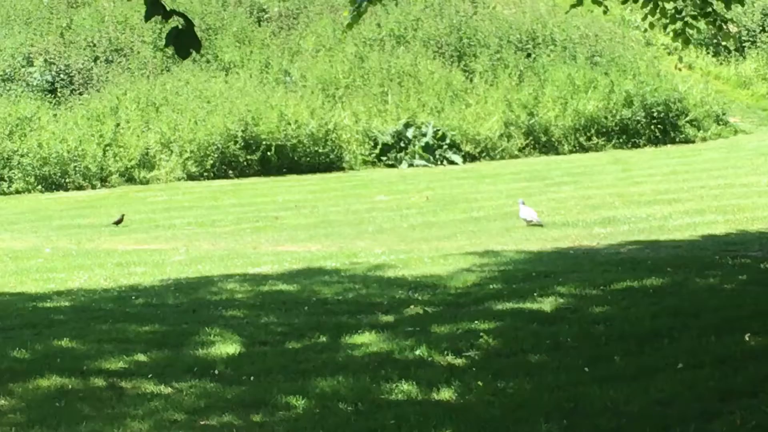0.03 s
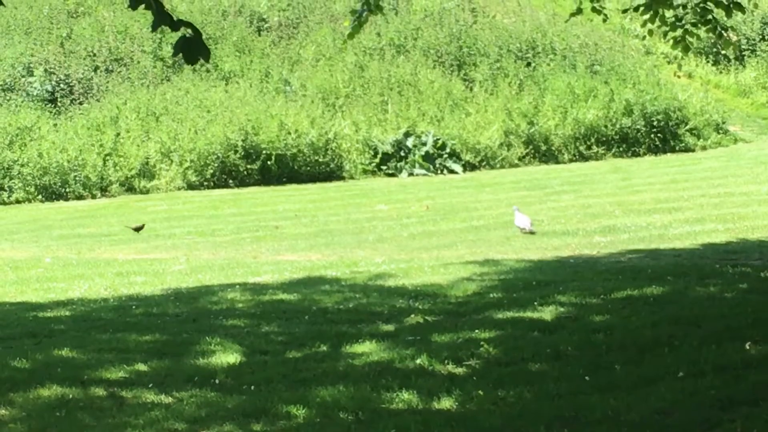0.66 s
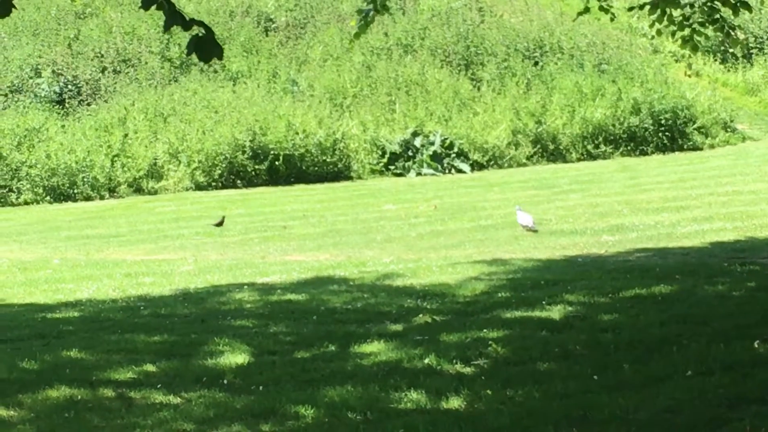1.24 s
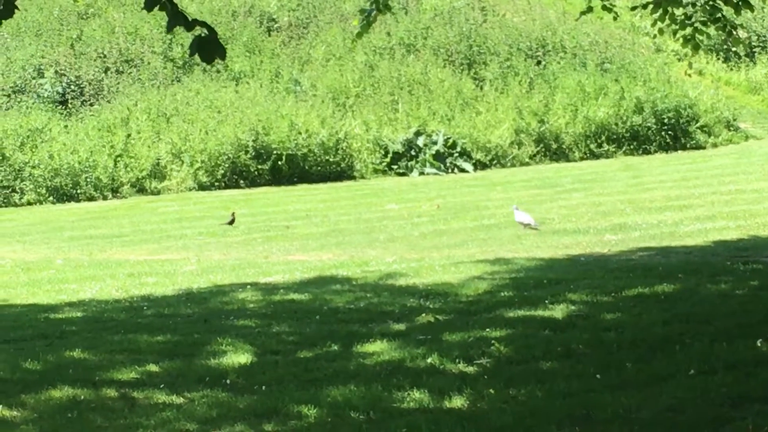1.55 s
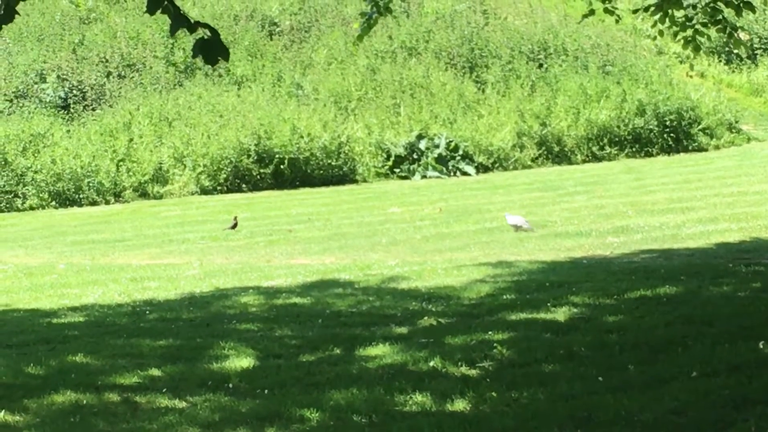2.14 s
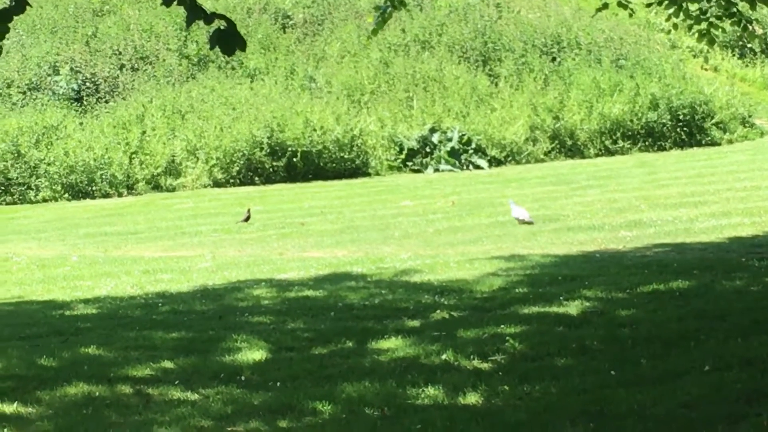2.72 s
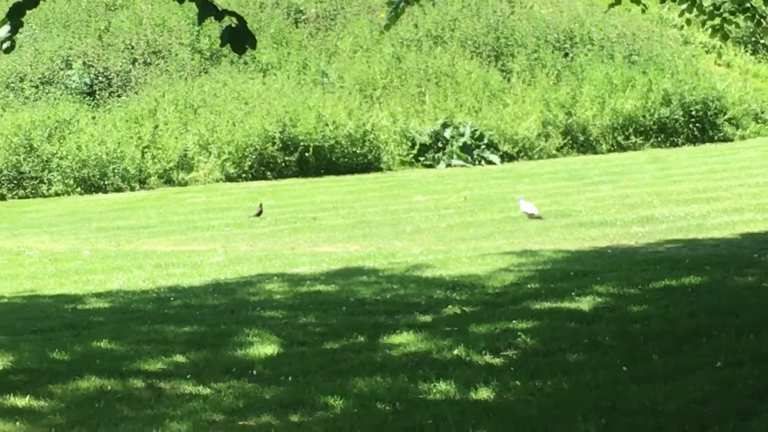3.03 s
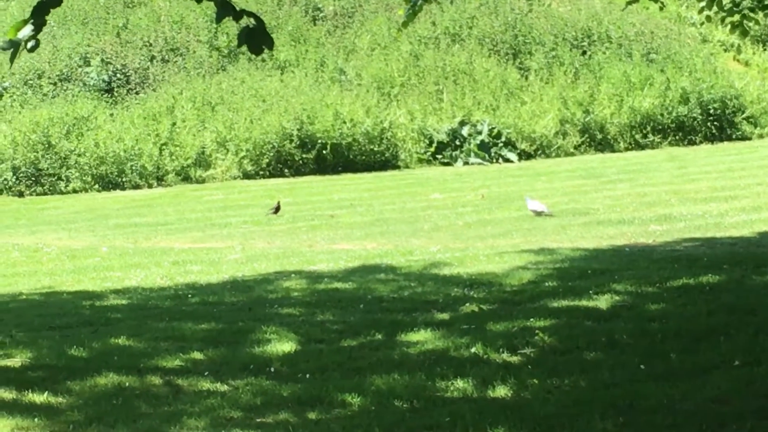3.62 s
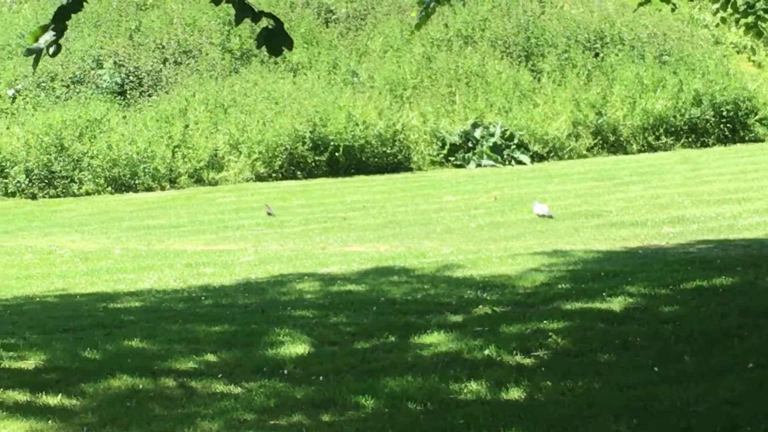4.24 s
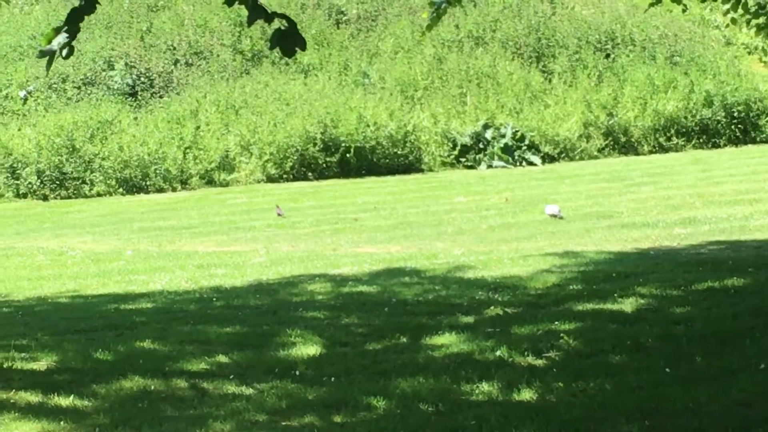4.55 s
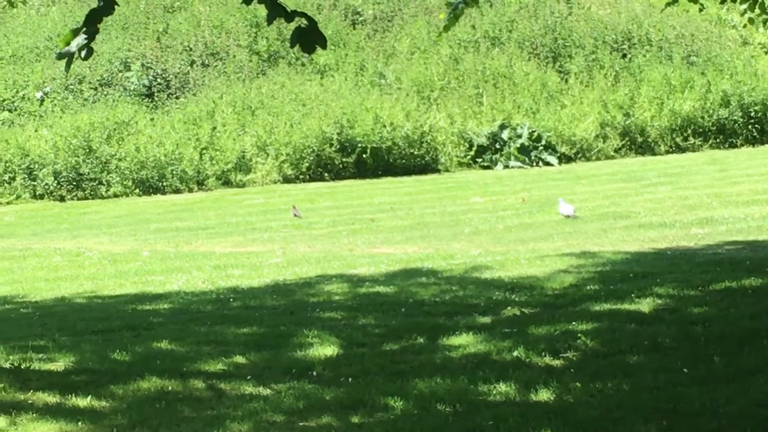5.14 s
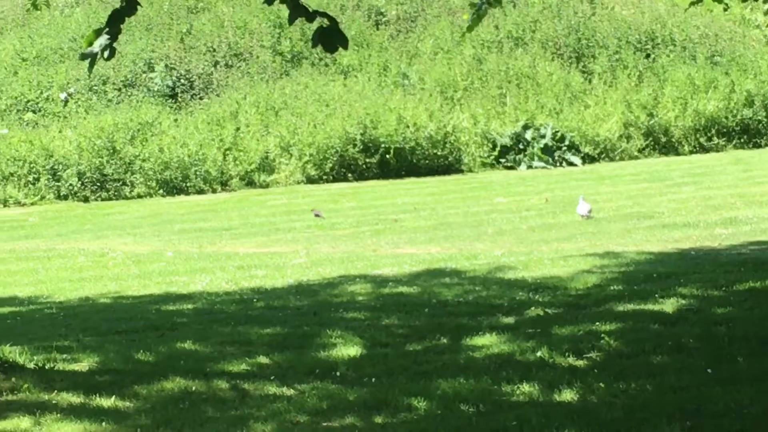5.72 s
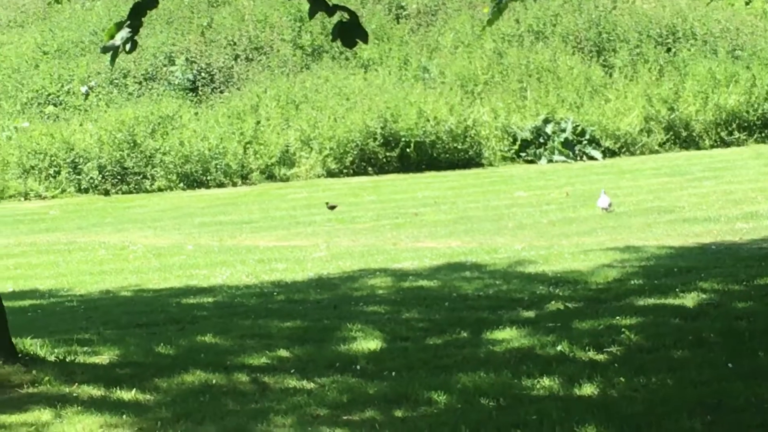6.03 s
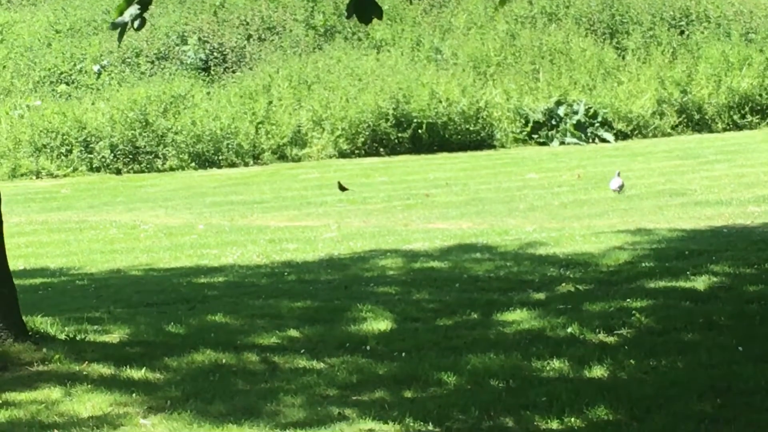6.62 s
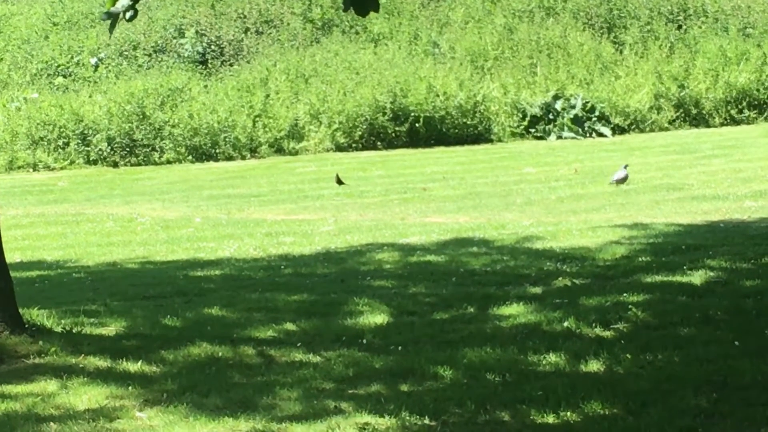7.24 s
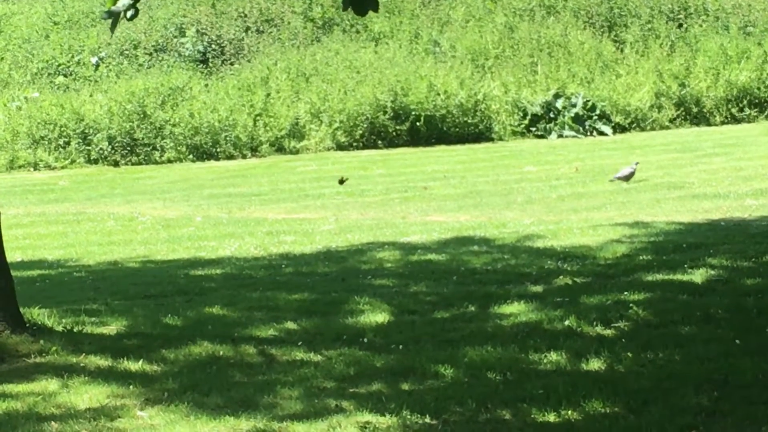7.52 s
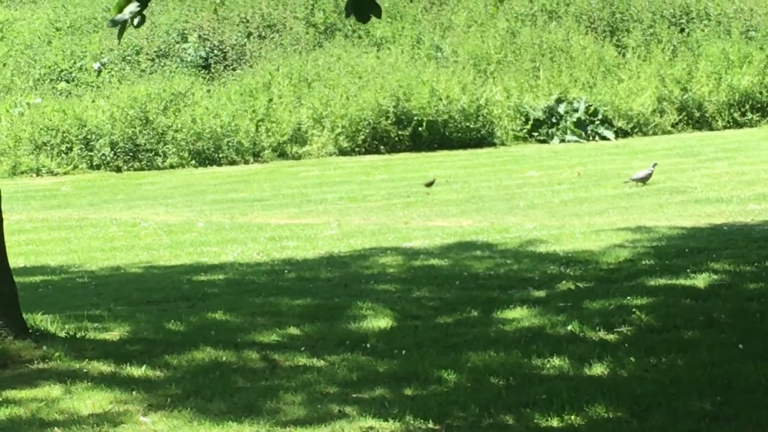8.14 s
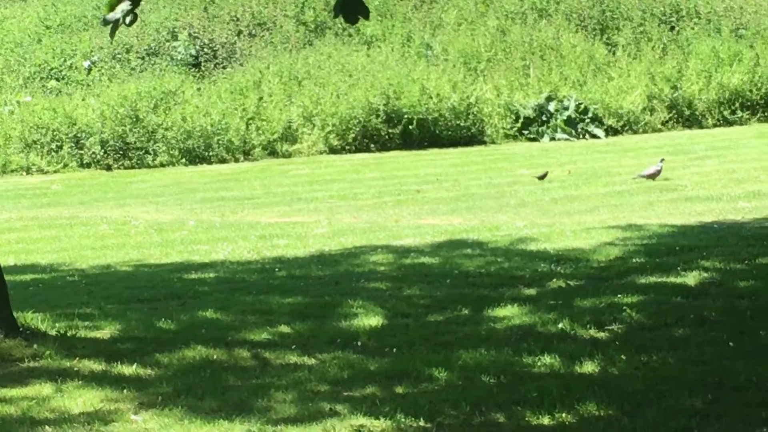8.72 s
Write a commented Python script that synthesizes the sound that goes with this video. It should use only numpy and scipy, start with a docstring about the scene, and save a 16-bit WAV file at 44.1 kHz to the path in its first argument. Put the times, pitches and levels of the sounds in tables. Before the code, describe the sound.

Distant traffic rumbles steadily outdoors while a tiny bird repeats high alternating notes and a lower bird whistles far off near the end.

```python
"""A lawn with trees, near a distant road: rumble, engine drone, tyre roar, a breeze in the leaves.
A tiny songbird sings one thin, very high phrase: soft slurs, then a repeated figure of long whistle,
low lift and arched note. A twig ticks and scrapes once. Far off, one bird pipes softly and a lower one
whistles near the end. Each note is a pure syrinx tone, smeared by echoes from the foliage."""
import sys
import numpy as np
from scipy import signal
from scipy.fft import rfft, irfft
from scipy.io import wavfile

SR = 44100
rng = np.random.default_rng(int(sys.argv[2]) if len(sys.argv) > 2 else 0)


def digitize_waveform(pressure):
    """Quantize a signal to 16-bit integers and store it at the path in sys.argv[1].

    Rows of a 2-D input are taken as channels; values are limited to [-1, 1].
    """
    field = np.atleast_2d(pressure).T
    bounded = np.clip(field, -1, 1)
    quanta = np.round(bounded * 32767).astype(np.int16)
    wavfile.write(sys.argv[1], SR, quanta)


N = 391166
TIME_S = np.arange(N) / SR
FREQS_HZ = np.maximum(np.fft.rfftfreq(N, 1 / SR), 1)

# Noise colours. Each row: frequency in Hz, relative density in dB.
RUMBLE_SPECTRUM = [(15, -34), (23, -32.5), (32, -13), (41, -5.5), (56, 0.5), (72, -1.5), (100, -8),
                   (140, -11), (230, -15.5), (290, -22), (360, -25.5), (450, -32)]
TYRE_SPECTRUM = [(450, -10.5), (560, -8), (800, -3.5), (1000, 0.0), (1300, -4), (1700, -8), (2200, -12.5),
                 (2850, -20), (3300, -21), (4200, -26.5), (5000, -32)]
HISS_SPECTRUM = [(5000, -1), (5500, 0.5), (6500, -2), (7500, -6), (8500, -4.5), (9800, -5.5), (10400, -10),
                 (11200, -6.5), (13500, -8.5), (15500, -9)]
TWIG_SPECTRUM = [(900, -8), (1800, 6), (2800, 4), (4000, -3), (5000, -13), (8000, -27)]
# Slow swells. Each row: time in seconds, relative level in dB.
RUMBLE_SWELL = [(0.3, -44.5), (1.0, -47), (1.7, -44.5), (3.0, -46.5), (3.55, -43), (4.1, -50.5),
                (4.65, -44), (5.25, -51.5), (5.8, -45.5), (6.2, -48), (7.2, -45.5), (7.6, -47.5),
                (8.7, -46)]
DRONE_SWELL = [(0.4, -54.5), (0.9, -52.5), (2.2, -53), (4.2, -53), (6.1, -53), (6.6, -54.5), (7.8, -54.5),
               (8.8, -49.5)]  # grows at the end
TYRE_SWELL = [(0.1, -55.5), (2.4, -54.5), (3.2, -55.5), (5.1, -55.5), (8.3, -55)]  # one vehicle passes early
BREEZE_SWELL = [(0.7, -75), (6.7, -75), (7.4, -77.5), (8.8, -77)]  # holds, then drops

# Soft opening notes. Each row: start in seconds, length in seconds, pitch in Hz, level in dB.
SLURS = [(2.005, 0.03, 6924, -84.1), (2.255, 0.03, 7136, -82.9), (2.445, 0.029, 6997, -76.5),
         (2.825, 0.025, 6968, -79), (3.0, 0.027, 6955, -75), (3.203, 0.027, 7130, -69.2),
         (3.39, 0.046, 6850, -76.5), (3.607, 0.037, 7130, -67), (3.777, 0.038, 6840, -68.5)]
# Repeated figure. Each row: start in seconds, whistle length in seconds, whistle level in dB,
# scoop in Hz, accent in dB, lift level in dB, arch pitch in Hz, arch level in dB.
FIGURES = [(3.913, 0.092, -67.5, 0, 11, -74.5, 6790, -64.5), (4.281, 0.13, -68, -2, 8, -72, 6880, -64.5),
           (4.665, 0.13, -66.5, 48, 11, -67, 6630, -61), (5.055, .14, -66, 41, 1.5, -67.5, 6640, -63.5),
           (5.459, .14, -62.5, 65, 9, -68, 6610, -60.5), (5.844, 0.14, -63.5, 95, 12, -76, 6560, -61.5),
           (6.229, 0.15, -64, 95, 6.5, -80, 6480, -59.5)]
# Faint lift ahead of the figures: start in seconds, level in dB.
FIRST_LIFT = (3.697, -83)
# Closing whistle: start in seconds, length in seconds, level in dB, scoop in Hz, accent in dB.
LAST_WHISTLE = (6.615, 0.122, -68.5, 140, -8)
# Note gestures. Each row: share of length, pitch offset in Hz, relative level in dB.
SLUR_SHAPE = [(0, 168, -10), (.3, 113, -7), (.65, 0, -1), (1, -73, -10)]
WHISTLE_SHAPE = [(0, 6, -7), (.25, 40, -2), (.52, 64, -1), (.72, 51, -1.5), (.87, -18, 2.5), (1, -115, -2)]
LIFT_SHAPE = [(0, -280, -9), (.3, -110, 5), (.65, 10, 11), (1, 110, -5)]
ARCH_SHAPE = [(0, -480, -16), (.2, -46, -5), (.36, 135, -1.5), (.65, -30, 2.5), (1, -78, 1.5)]
# Stress within a whistle. Each row: share of length, share of scoop, share of accent.
WHISTLE_STRESS = [(0, 1, 0), (.18, .3, 0), (.5, 0, 0), (.72, 0, 0), (.87, 0, 1), (1, 0, 1)]

# Twig tick, then scrape. Each row: start in seconds, level in dB, decay in seconds.
TWIG_TICKS = [(2.412, -57, 0.025), (2.436, -63, 0.03)]
# Far bird piping on one pitch. Each row: start in seconds, length in seconds, level in dB.
PIPES = [(3.295, 0.042, -80), (3.421, .045, -76), (3.529, 0.068, -83.5)]
# Lower far bird. Each row: start in seconds, length in seconds, pitch in Hz, glide in Hz, level in dB.
FAR_NOTES = [(7.41, 0.1, 2070, 200, -71), (7.875, 0.055, 1840, 110, -65.5), (8.055, 0.062, 2474, 13, -64),
             (8.127, 0.043, 3085, -30, -75), (8.163, 0.035, 2395, -110, -62),
             (8.268, .095, 2330, -8, -61.5), (8.5, 0.056, 2070, -70, -66.5), (8.571, 0.056, 2066, -90, -63)]

WHISTLE_HZ, WHISTLE_SAG_HZ_PER_S = 7190, 70
LIFT_HZ, LIFT_SAG_HZ_PER_S = 6010, 178
LIFT_DELAY_S, LIFT_LENGTH_S = 0.055, 0.026
ARCH_DELAY_S, ARCH_LENGTH_S = 0.129, 0.0448
TREMOR_DB, NOTE_EDGE_S = 2, 0.0034
PIPE_HZ, TICK_ATTACK_S = 3170, 0.0063


def undb(db):
    """Decibels to gain."""
    return 10 ** (np.asarray(db) / 20)


def level(x, db):
    """Scale to an rms level."""
    return x * undb(db) / np.sqrt(np.mean(x ** 2))


def noise(spectrum, db):
    """Coloured noise at an rms level."""
    hz, density_db = np.transpose(spectrum)
    colour = undb(np.interp(np.log(FREQS_HZ), np.log(hz), density_db, left=-120, right=-120))
    return level(irfft(rfft(rng.standard_normal(N)) * colour, N), db)


def walk(rate_hz):
    """Smooth random wander, rms 1."""
    return level(irfft(rfft(rng.standard_normal(N)) / (1 + (FREQS_HZ / rate_hz) ** 4), N), 0)


def swell(curve):
    """Gain along a level curve, mean power 1."""
    times_s, db = np.transpose(curve)
    return level(undb(np.interp(TIME_S, times_s, db)), 0)


def below(x, hz):
    """Zero-phase low-pass."""
    return irfft(rfft(x) / (1 + (FREQS_HZ / hz) ** 8), N)


def road():
    """Deep rumble, engine drone and tyre roar swell separately; a faint hum wavers in them."""
    low = noise(RUMBLE_SPECTRUM, db=-45)
    deep = below(low, hz=115)
    flutter = level(undb(1.47 * walk(rate_hz=9.4)), 0)
    rumble = deep * swell(RUMBLE_SWELL) * flutter
    drone = (low - deep) * swell(DRONE_SWELL)
    tyres = noise(TYRE_SPECTRUM, db=-55.5) * swell(TYRE_SWELL) * undb(0.4 * walk(rate_hz=8.5))
    hum_hz = 322.8 + 0.887 * walk(rate_hz=1.92)
    hum = np.sin(2 * np.pi * np.cumsum(hum_hz) / SR) * undb(2 * walk(rate_hz=1.5))
    return rumble + drone + tyres + level(hum, db=-76.5)


def breeze(traffic):
    """Traffic plus smooth hiss; the band where leaves rustle follows the breeze."""
    air = traffic + noise(HISS_SPECTRUM, db=-78)
    leaves = below(air, hz=6800) - below(air, hz=2950)
    gusts = swell(BREEZE_SWELL) * undb(0.51 * walk(rate_hz=6.4))
    return air + leaves * (gusts - 1)


def syrinx(notes, shape, quaver_hz):
    """Pure tones that follow a gesture; pitch and loudness quaver together."""
    out, quaver = np.zeros(N), walk(rate_hz=83)
    share, bend_hz, effort_db = np.transpose(shape)
    for start_s, length_s, hz, db in notes:
        span = np.arange(int(start_s * SR), min(int((start_s + length_s) * SR), N))
        progress = np.linspace(0, 1, len(span))
        pitch_hz = hz + np.interp(progress, share, bend_hz) + quaver_hz * quaver[span]
        tone = np.sin(2 * np.pi * np.cumsum(pitch_hz) / SR)
        gain = undb(np.interp(progress, share, effort_db) + TREMOR_DB * quaver[span])
        edges = np.clip(np.minimum(progress, 1 - progress) * length_s / NOTE_EDGE_S, 0, 1)
        out[span] += level(tone * gain * np.sin(edges * np.pi / 2) ** 2, db)
    return out


def foliage(x, direct_db, near_db, near_t60_s, far_db, far_t60_s):
    """Near leaves scatter a quick cloud of echoes; farther trees return a long tail."""
    t = TIME_S[:SR]
    build_up = 1 - np.exp(-t / 0.012)
    out = undb(direct_db) * x
    for db, t60_s in ((near_db, near_t60_s), (far_db, far_t60_s)):
        echoes = rng.standard_normal(SR) * undb(-60 * t / t60_s) * build_up
        out += undb(db) * signal.fftconvolve(x, echoes / np.linalg.norm(echoes))[:N]
    return out


def songbird():
    """Four kinds of note from one throat, heard through the leaves."""
    whistles, lifts, arches = figures()
    voice = syrinx(SLURS, SLUR_SHAPE, quaver_hz=29)
    voice += sum(whistle(*note) for note in whistles)
    voice += syrinx(lifts, LIFT_SHAPE, quaver_hz=45)
    voice += syrinx(arches, ARCH_SHAPE, quaver_hz=24)
    return foliage(voice, direct_db=-1.3, near_db=-2, near_t60_s=0.13, far_db=-9, far_t60_s=0.8)


def figures():
    """Note lists for the repeated figure; lift and arch are timed from the whistle's end."""
    start_s, db = FIRST_LIFT
    whistles, lifts, arches = [], [(start_s, LIFT_LENGTH_S, LIFT_HZ, db)], []
    for start_s, length_s, whistle_db, scoop_hz, accent_db, lift_db, arch_hz, arch_db in FIGURES:
        end_s = start_s + length_s
        lift_hz = sagged(LIFT_HZ, LIFT_SAG_HZ_PER_S, start_s)
        whistles.append((start_s, length_s, whistle_db, scoop_hz, accent_db))
        lifts.append((end_s + LIFT_DELAY_S, LIFT_LENGTH_S, lift_hz, lift_db))
        arches.append((end_s + ARCH_DELAY_S, ARCH_LENGTH_S, arch_hz, arch_db))
    return whistles + [LAST_WHISTLE], lifts, arches


def sagged(hz, hz_per_s, time_s):
    """Pitch sinking steadily from the first figure on."""
    return hz - hz_per_s * (time_s - FIGURES[0][0])


def whistle(start_s, length_s, db, scoop_hz, accent_db):
    """The long note: scoops up, holds, drops onto an accent."""
    share, bend_hz, effort_db = np.transpose(WHISTLE_SHAPE)
    stress_share, scoop, accent = np.transpose(WHISTLE_STRESS)
    bend_hz -= scoop_hz * np.interp(share, stress_share, scoop)
    effort_db += accent_db * np.interp(share, stress_share, accent)
    hz = sagged(WHISTLE_HZ, WHISTLE_SAG_HZ_PER_S, start_s)
    return syrinx([(start_s, length_s, hz, db)], list(zip(share, bend_hz, effort_db)), quaver_hz=10.7)


def twig():
    """Soft dry tick and scrape: two decaying noise bursts."""
    out = np.zeros(N)
    for start_s, db, decay_s in TWIG_TICKS:
        age_s = np.maximum(TIME_S - start_s, 0)
        attack = np.minimum(age_s / TICK_ATTACK_S, 1)
        out += noise(TWIG_SPECTRUM, db) * attack * np.exp(-age_s / decay_s)
    return out


def far_birds():
    """Two distant fluty voices, nearly as much echo as direct sound."""
    voices = sum(slide(*note) for note in FAR_NOTES)
    voices += sum(slide(start_s, length_s, PIPE_HZ, 0, db) for start_s, length_s, db in PIPES)
    return foliage(voices, direct_db=0, near_db=-8.5, near_t60_s=0.14, far_db=-2.5, far_t60_s=1.0)


def slide(start_s, length_s, hz, glide_hz, db):
    """One fluty note, swelling as it glides evenly through its pitch."""
    shape = [(0, -glide_hz / 2, -1.8), (1, glide_hz / 2, 1)]
    return syrinx([(start_s, length_s, hz, db)], shape, quaver_hz=12)


def scene():
    """Birds and twig over road and breeze, mono."""
    return (songbird() + far_birds() + twig() + breeze(road()))[None]


def record(dry):
    """Brief opening silence; steep treble cut."""
    silence_s, fade_s, top_hz = 0.084, 0.002, 15700
    opening = np.clip((TIME_S - silence_s) / fade_s, 0, 1)
    lowpass = signal.ellip(10, 0.1, 70, top_hz, fs=SR, output="sos")
    return signal.sosfilt(lowpass, dry * opening)


dry = scene()
out = record(dry)
digitize_waveform(out)
```